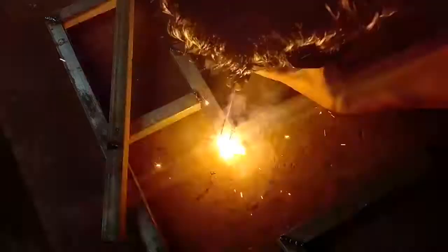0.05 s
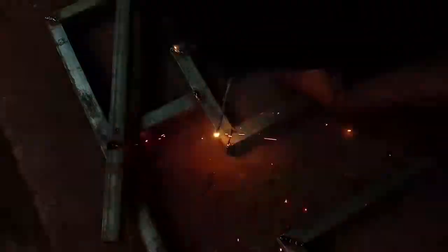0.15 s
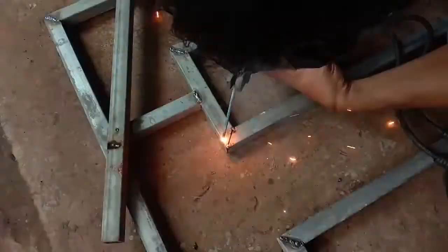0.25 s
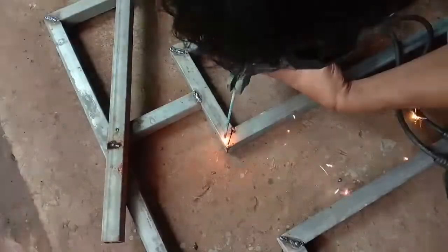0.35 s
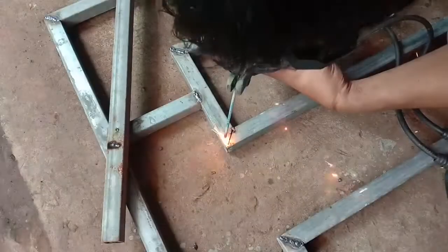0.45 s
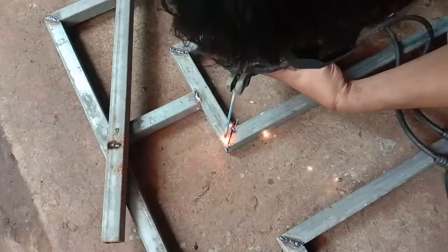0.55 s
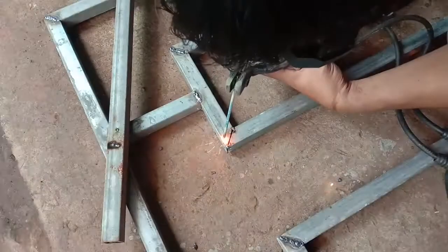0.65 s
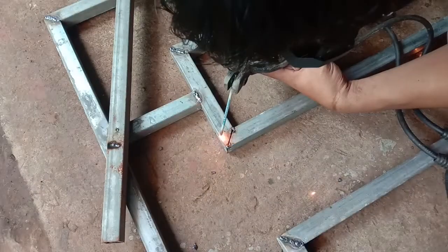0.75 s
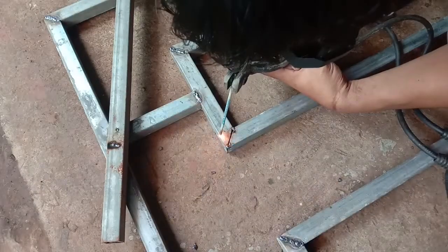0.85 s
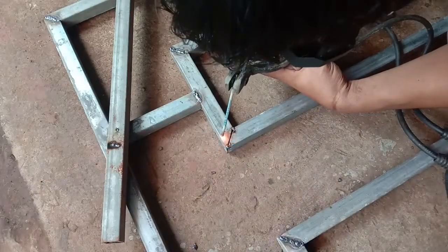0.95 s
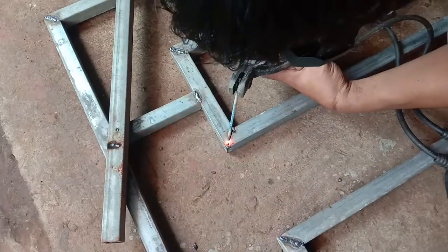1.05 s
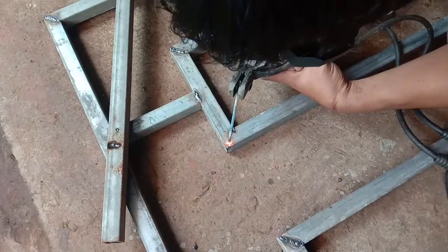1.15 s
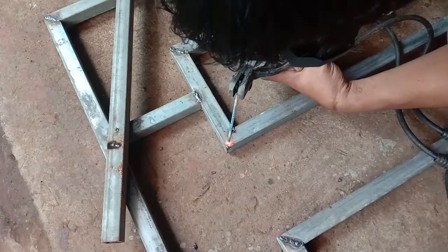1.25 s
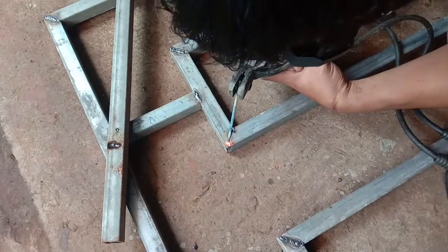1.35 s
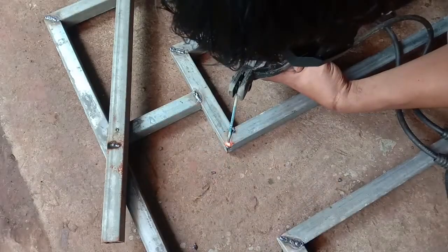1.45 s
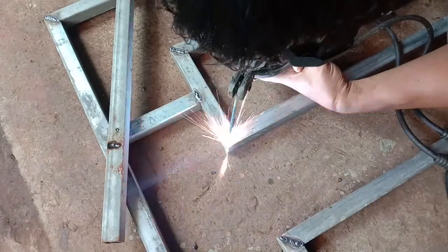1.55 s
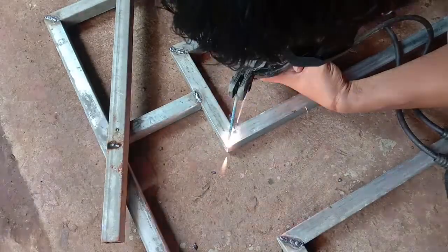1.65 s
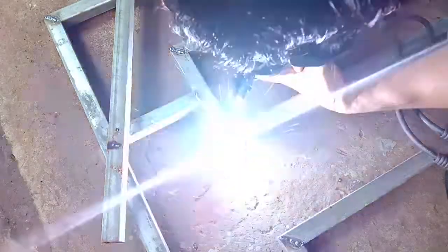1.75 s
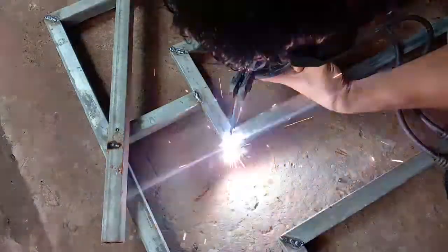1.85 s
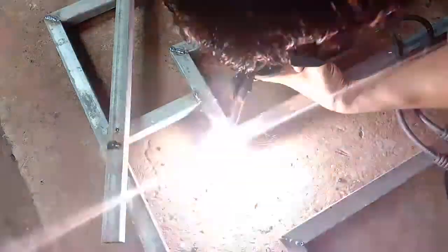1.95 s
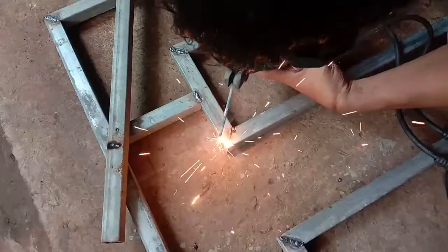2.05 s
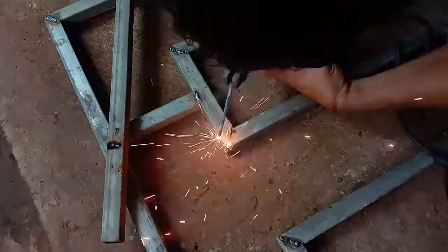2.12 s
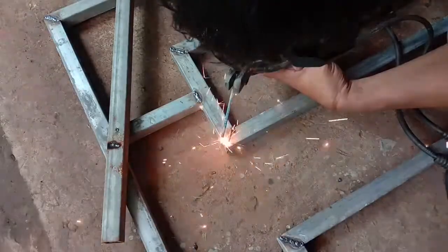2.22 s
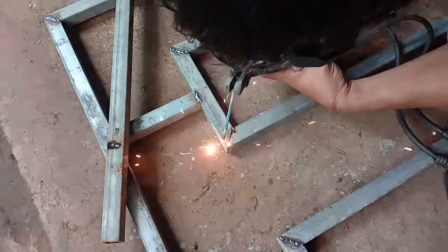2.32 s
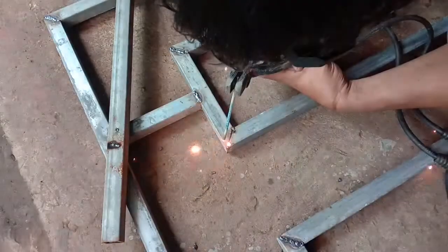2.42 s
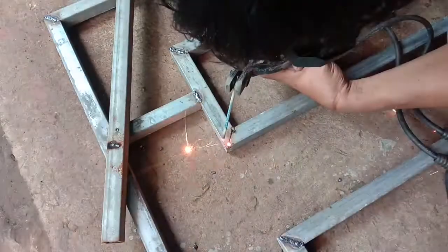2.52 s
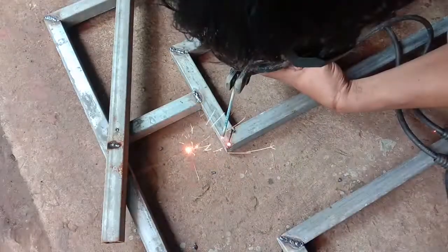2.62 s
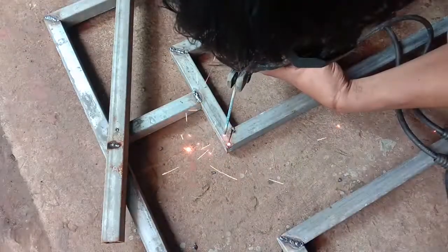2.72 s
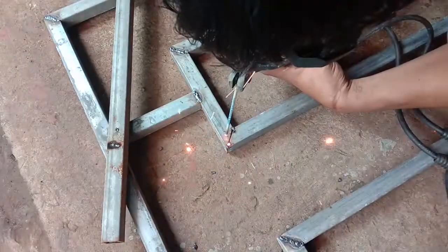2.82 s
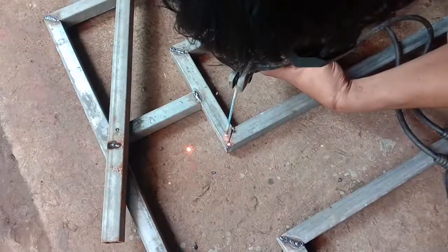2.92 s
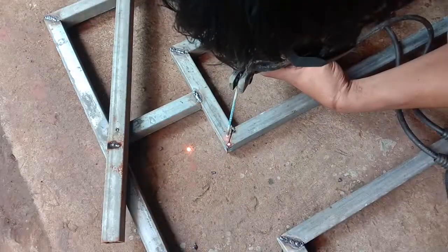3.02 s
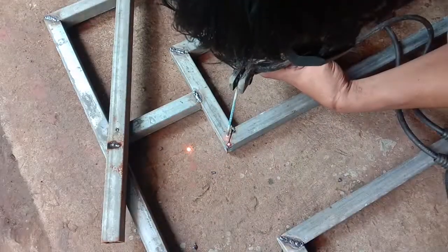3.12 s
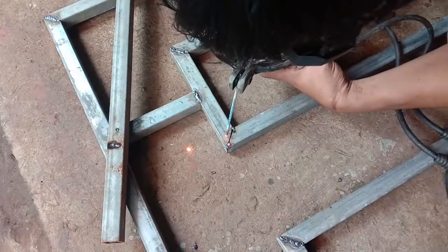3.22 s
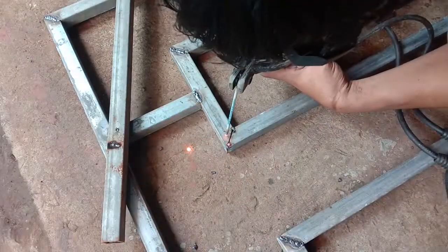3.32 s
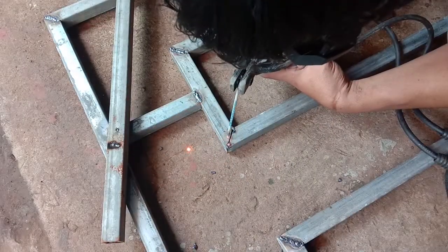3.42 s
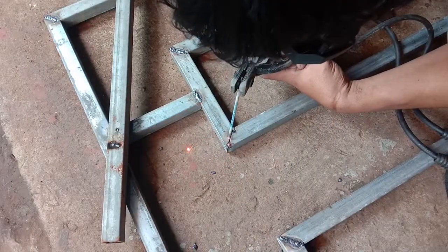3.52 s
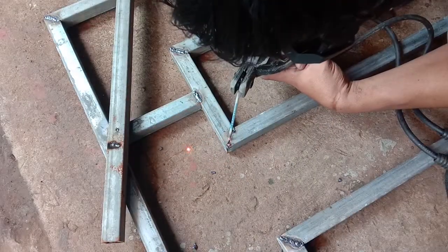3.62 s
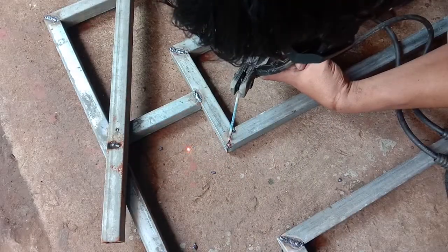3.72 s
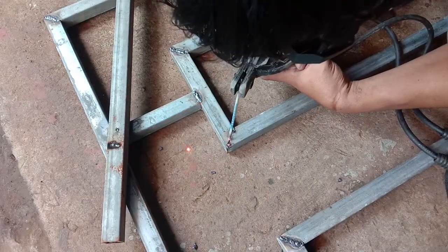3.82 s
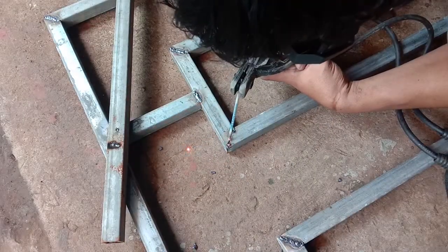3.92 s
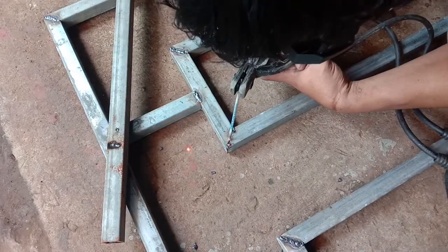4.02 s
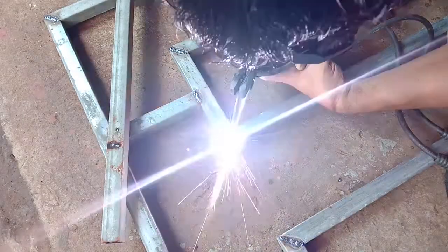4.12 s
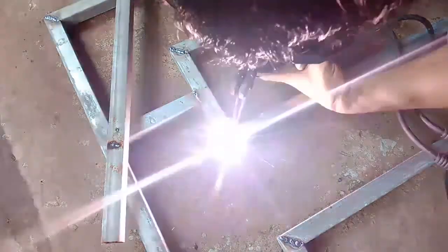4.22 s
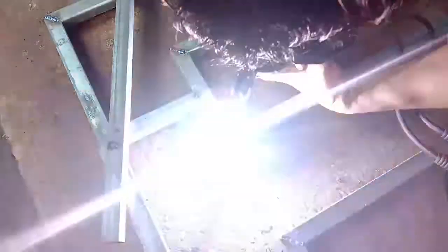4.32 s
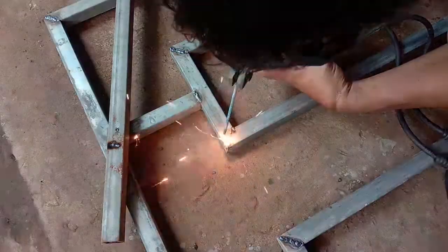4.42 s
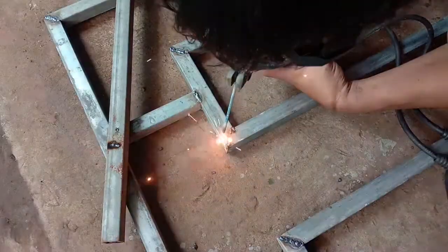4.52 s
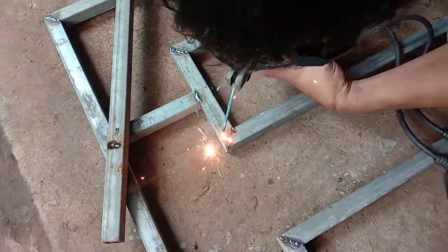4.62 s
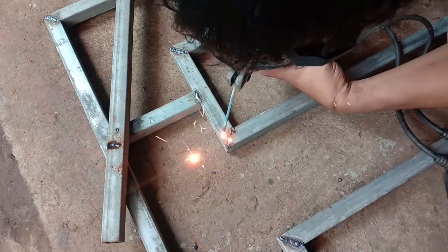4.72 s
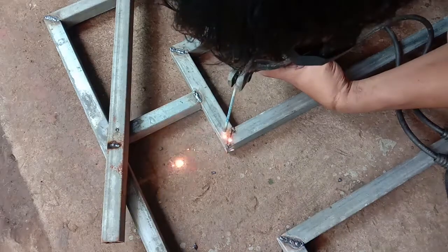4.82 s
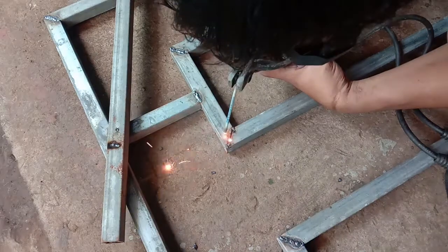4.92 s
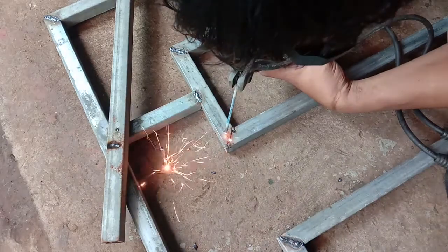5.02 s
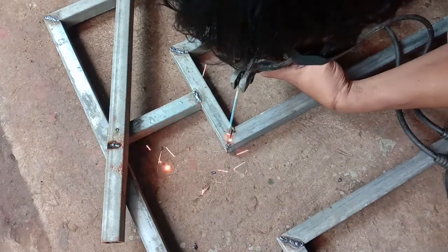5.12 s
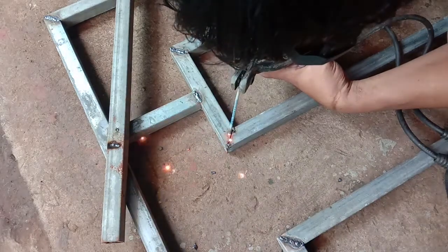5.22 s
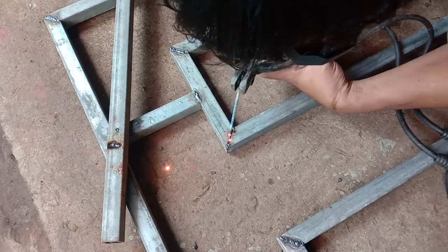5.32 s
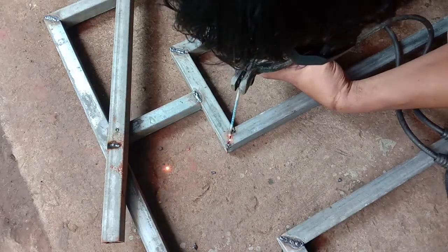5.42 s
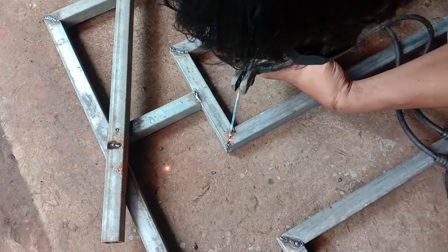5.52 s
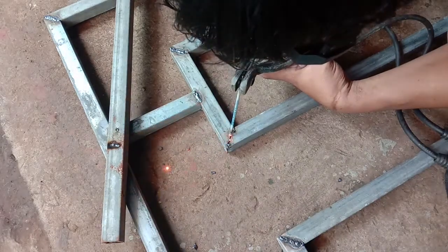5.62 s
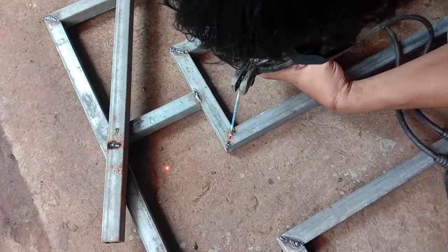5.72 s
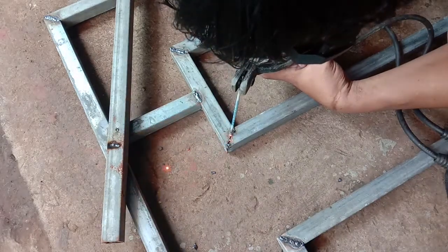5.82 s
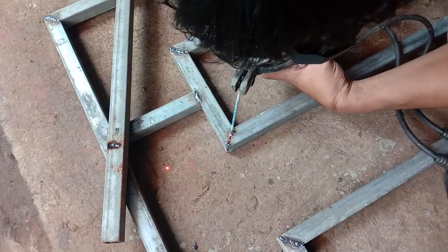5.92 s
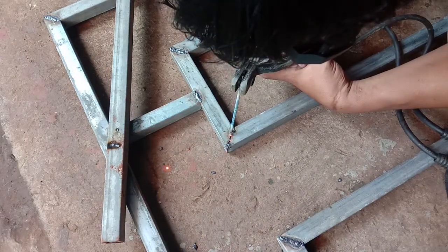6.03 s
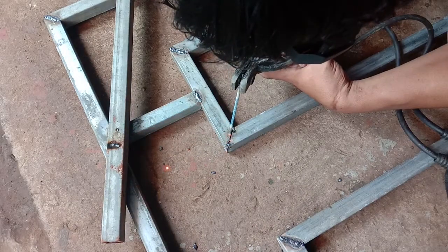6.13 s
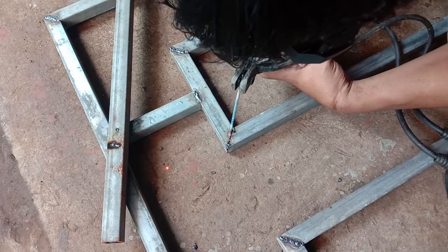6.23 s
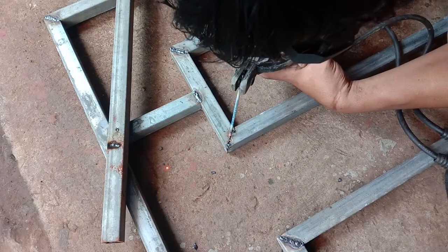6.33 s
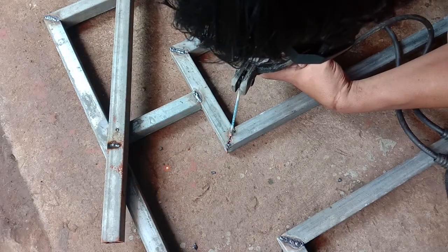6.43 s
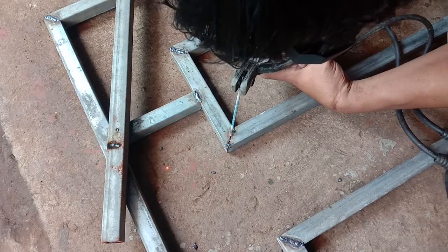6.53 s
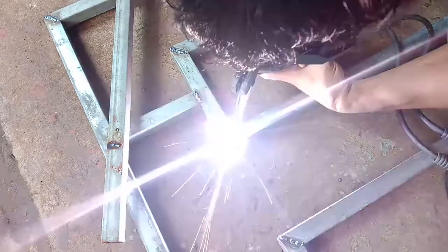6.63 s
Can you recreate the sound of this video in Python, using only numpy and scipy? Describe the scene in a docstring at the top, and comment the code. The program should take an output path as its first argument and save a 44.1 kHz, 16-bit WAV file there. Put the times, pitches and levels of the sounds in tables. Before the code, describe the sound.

A stick welder strikes short, sizzling, popping arcs on a steel tube, over the steady whine and rush of its cooling fan.

```python
"""Tack welds with a stick electrode on a thin steel tube frame lying on a concrete floor, close up.
The welder's seven-bladed fan whines and rushes from the start, and a little air stirs at the microphone.
The arc strikes with a thump and leaves slag ticking as it cools. At 1.6 s and 4.1 s come two longer tacks:
bright sizzle, sharp pops as droplets short the arc, the tube ringing under the rod, then fizz and ticks.
From 6 s the rod and spatter knock and puff, and at 6.6 s the arc catches once more."""
import sys
import numpy as np
from scipy import signal
from scipy.fft import rfft, irfft
from scipy.io import wavfile

SR = 44100
rng = np.random.default_rng(int(sys.argv[2]) if len(sys.argv) > 2 else 0)


def to_wav(s):
    """Save 16-bit WAV."""
    ch = np.atleast_2d(s).T  # columns
    pcm = np.round(np.clip(ch, -1, 1) * 32767)  # PCM
    wavfile.write(sys.argv[1], SR, pcm.astype(np.int16))


N = 293706
TIME = np.arange(N) / SR

# low swells, from breeze on the microphone and (first and last) the arc thumping as it strikes:
# (centre t/s, half length/s, level/dB)
LOW_SWELLS = [(0.03, 0.045, -40), (2.03, 0.1, -50.5), (2.6, 0.26, -53.5), (3.2, 0.25, -54),
              (4.42, 0.15, -58), (4.92, .1, -58), (5.2, .07, -56), (6.17, 0.055, -47), (6.61, 0.031, -53)]
# their rumble; each colour is a relative noise spectrum: (f/Hz, level/dB)
RUMBLE_COLOUR = [(20, 15.5), (35, -14), (55, -1), (100, 7.5), (200, 5), (400, -35.5)]
# single low thumps, first the arc striking, then breeze on the microphone: (t/s, peak level/dB, f/Hz)
LOW_THUMPS = [(0.04, -25.5, 151), (1.89, -41, 70), (1.95, -35, 50), (2.622, -32, 89), (2.655, -38, 60),
              (2.714, -35, 90), (2.74, -35, 80), (2.765, -49, 60), (3.161, -39, 108), (3.39, -36, 80.5),
              (5.2, -36.5, 174), (6.17, -37, 171)]

# the fan's blade-pass pitch: (t/s, f/Hz)
FAN_PITCH = [(0, 552.7), (0.8, 552.5), (1.5, 552.8), (2.2, 552.3), (2.8, 551.9), (3.4, 552.7), (4.0, 552.2),
             (4.8, 551.6), (5.3, 549.8), (5.8, 549.6), (6.66, 550.0)]
# whine heard through standing waves that shift with the pitch:
# (blade harmonic, rms level at full speed/dB, gain as the pitch sags/(dB/Hz))
FAN_WHINE = [(1, -47.5, 1.0), (3, -48, 0.7), (4, -43, -2), (6, -48.5, 0.46)]
# fainter fan tones: (multiple of the shaft rate)
SHAFT_ORDERS = [6, 9, 11, 12, 14, 35, 49, 56, 63]
# one level for each of those tones: (rms level/dB)
SHAFT_LEVELS = [-59, -62, -63, -65, -56, -60, -63, -71, -71]
# air rushing through the case, up to 4.7 kHz: (f/Hz, level/dB)
RUSH_COLOUR = [(150, -10.5), (380, -7.5), (480, -3), (950, -3), (1200, -13.5), (1550, -3), (1900, -15),
               (2350, 0.5), (2700, -2.5), (2850, -7), (3700, -8), (4700, -13.5)]
# the same rush from 4.7 kHz up: (f/Hz, level/dB)
RUSH_TOP_COLOUR = [(4700, -12), (6500, -12), (7300, -20), (8300, -30), (10200, -36), (11500, -45),
                   (13900, -53), (14600, -43), (15200, -40), (16000, -44)]

# the weld and fallen sparks fizz, swell and cool: (crest t/s, top band level/dB)
FIZZ_SWELLS = [(0.0, -61.5), (0.52, -62.5), (2.0, -59), (4.41, -64), (4.97, -64), (6.12, -64)]
# the sheen of that fizz: (f/Hz, level/dB)
FIZZ_COLOUR = [(8000, -0.5), (10400, -3), (11500, -9.5), (13800, -15), (14800, -3), (16500, 1)]
# slag cracks and sparks land: (t/s, top band peak level/dB, mid band against it/dB)
SLAG_TICKS = [(0.1585, -47, 6), (0.2249, -45, 2), (0.2553, -44, 9), (0.2674, -47, 6), (0.4015, -43, 12),
              (0.4473, -38, 5.5), (0.5227, -45, 8), (2.1241, -43, 0), (2.3575, -49, 13), (2.4144, -47, 8),
              (3.9666, -39, 8), (4.5231, -48, 4), (4.6833, -45, 2), (4.7386, -43, 5), (4.7444, -45, 2),
              (4.7514, -43, 0), (4.7604, -48, 0), (4.7935, -44, 3), (4.8254, -41, 7), (4.8314, -43, 9),
              (4.8474, -46, 3), (4.9023, -46, 3), (4.9463, -39.5, 10), (5.004, -39, 8), (5.0144, -47, 2),
              (5.0294, -47, 4), (5.0689, -44, 10), (5.1103, -48, 12)]
# the brittle top of those ticks: (f/Hz, level/dB)
SLAG_COLOUR = [(8000, -1), (10000, 0), (11300, -7), (12000, -9), (13700, -17), (14700, -1), (16500, -6)]

# the hollow tube's ring, many modes near odd multiples of 79 Hz like an air column closed at one end:
# (f/Hz, relative level/dB, t60/s)
TUBE_MODES = [(385, -3, .25), (461, -4, .2), (555, -3, .25), (722, -3, .25), (875, 0, .3), (1027, -2, .3),
              (1195, -1, .3), (1357, -4, .3), (1500, 0, .3), (1823, -3, .2), (2134, -2, .15),
              (2465, 0, .15), (2620, -4, .12), (2769, -2, .2), (2923, -5, .1), (3097, 0, .2),
              (3241, -4, .2), (3416, -8, .2), (3720, -7, .2), (3946, -7, .2), (4490, -6, .15),
              (4670, -6, .12), (4760, -4, .18), (5229, -4, .14), (5348, -4, .14), (5585, -1, .12),
              (5766, -3, .12), (6240, 0, .12), (6336, -2, .08), (6492, -3, .12)]
# rod or spatter knocks and drags on the tube: (t/s, contact/s, low mode drive/dB, high mode drive/dB)
KNOCKS = [(0.002, 0.018, -34.5, -31), (1.562, 0.078, -39.5, -40), (4.107, 0.089, -35, -37),
          (6.059, 0.009, -57, -52), (6.121, 0.046, -62, -41), (6.413, 0.016, -60, -43.5),
          (6.598, 0.034, -32.5, -29)]

# the arc as the microphone colours it: (f/Hz, level/dB)
ARC_COLOUR = [(100, -24), (600, -14.5), (3600, -17.5), (4500, -10.5), (5500, -2.5), (6350, 2), (7000, -6),
              (7600, -19), (9400, -28), (10700, -21), (13800, -36.5), (14800, -25.5), (15500, -32),
              (16500, -55)]
# humps and hollows from nearby reflections: (f/Hz, width/Hz, gain/dB)
ARC_HUMPS = [(2440, 200, 4), (2920, 200, 4), (4000, 200, -5), (4330, 250, 4), (4950, 400, -3),
             (5430, 200, 2), (8000, 250, -5), (8740, 250, 3), (9100, 150, -6), (9480, 250, 5),
             (10000, 300, -6)]
# the arc flares or spatter puffs: (t/s, rise/s, burn/s, sizzle level/dB, fall/(dB/s),
# low roar against the sizzle/dB, top air against the sizzle/dB)
ARC_FLARES = [(0.0, 0.00033, 0.02, -26.5, 1500, -2, -16), (1.563, .001, 0.026, -31.5, 350, -9, -7.5),
              (1.655, 0.042, 0.031, -28, 900, -12, -12.5), (1.736, 0.00083, 0.019, -27.5, 700, -10.5, -9.5),
              (1.774, .005, 0.01, -32.5, 600, -7, -9), (1.829, 0.00078, 0.023, -29, 900, -17, -8.5),
              (1.85, 0.038, 0.02, -29, 300, -9.5, -10), (1.925, 0.014, 0.034, -29, 1500, -10.5, -13),
              (1.984, 0.00086, 0.0019, -29, 2000, 3, -8), (3.966, .002, .01, -52, 300, -20, -5),
              (4.106, 0.0015, 0.0066, -22, 600, -10.5, -14.5), (4.13, .001, .03, -39.5, 300, -6, -10),
              (4.199, 0.027, 0.011, -34.5, 500, -4.5, -5), (4.259, .001, 0.0076, -35, 500, -27, -7),
              (4.291, 0.041, 0.021, -23.5, 400, -16, -12), (4.361, 0.009, 0.019, -33.5, 3000, 0.5, -17),
              (6.058, 0.0028, 0.0052, -36, 500, -20, -13), (6.121, .002, 0.004, -24.5, 450, -35, -11),
              (6.412, 0.0023, 0.0036, -37.5, 448, -16, -25), (6.585, .001, .01, -37, 500, -13, -10),
              (6.597, .001, 0.0054, -27, 400, 4.5, -8.5), (6.634, 0.0095, .02, -27, 400, -10, -10)]
# droplet pops: (t/s, mid band peak level/dB, low band against it/dB, top band against it/dB)
ARC_POPS = [(0.0032, -10, -12, -25), (0.0115, -10, -7, -27), (0.0202, -15, -3, -29),
            (1.5643, -12, -12, -19), (1.5693, -9, -15, -20), (1.593, -14, -9, -18), (1.6055, -17, -23, -15),
            (1.6959, -14, -21, -19), (1.7018, -14, -26, -20), (1.7107, -14, -15, -20),
            (1.7159, -14, -26, -19), (1.7383, -11, -29, -24), (1.742, -11, -29, -23),
            (1.7543, -13, -14, -13), (1.7658, -15, -25, -18), (1.7864, -10, -25, -26),
            (1.8085, -27, -13, -10), (1.8317, -9, -30, -15), (1.839, -14, -26, -17),
            (1.8449, -15, -25, -22), (1.889, -17, -10, -16), (1.8986, -14, -26, -18),
            (1.9061, -15, -25, -16), (1.937, -20, -20, -16), (1.9855, -9, -8, -19), (4.1083, -13, -10, -19),
            (4.1123, -7, -14, -22), (4.1876, -31, 0, -9), (4.2288, -15, -25, -7), (4.2596, -9, -31, -23),
            (4.2661, -17, -23, -22), (4.2979, -22, -7, -14), (4.3351, -12, -28, -21),
            (4.3405, -9, -31, -14), (4.3433, -9, -31, -22), (4.3469, -10, -19, -21),
            (4.3521, -10, -30, -26), (4.3665, -14, -3, -22), (4.3724, -13, -13, -24),
            (4.3859, -11, -5, -22), (6.1218, -16, -24, -19), (6.1255, -14, -26, -21), (6.5998, -13, 1, -15),
            (6.604, -14, -4, -15), (6.6102, -15, -4, -21), (6.651, -15, -14, -18)]

LOW_HZ, TOP_HZ = 3300, 8600  # crossovers between the low, mid and top bands


def from_db(db):
    """Decibels to gain."""
    return 10 ** (np.asarray(db) / 20)


def unit_power(x):
    """Scales a signal to an rms of 1."""
    return x / np.sqrt(np.mean(x ** 2) + 1e-20)


def unit_energy(pulse):
    """Scales an impulse response so that it keeps the power of white noise."""
    return pulse / np.sqrt(np.sum(pulse ** 2))


def through(x, pulse):
    """Filters by an impulse response."""
    return signal.fftconvolve(x, pulse)[:N]


def drift(rate_hz):
    """A smooth random wobble with an rms of about 1."""
    step, settle = 40, 2000
    pole = np.exp(-2 * np.pi * step * rate_hz / SR)
    noise = rng.standard_normal(N // step + settle + 2)
    slow = signal.lfilter([1], [1, -2 * pole, pole * pole], noise)[settle:]
    return np.interp(np.arange(N) / step, np.arange(len(slow)), unit_power(slow))


def envelope_db(start_s, full_s, release_s, up_db_per_s, down_db_per_s):
    """Silence, a straight climb to 0 dB, a hold, a straight fall."""
    climb = -up_db_per_s * np.maximum(full_s - TIME, 0) - 200 * (TIME < start_s)
    return climb - down_db_per_s * np.maximum(TIME - release_s, 0)


def equaliser(colour, low_hz=0, high_hz=SR, humps=(), size=8192):
    """Causal impulse response of unit energy with this colour between two soft band edges."""
    hz = np.maximum(np.arange(size // 2 + 1) * SR / size, 1)
    points_hz, level_db = np.transpose(colour)
    shape_db = np.interp(np.log(hz), np.log(points_hz), level_db)
    shape_db += sum(db * np.exp(-2 * ((hz - centre) / width) ** 2) for centre, width, db in humps)
    edges = np.log1p((low_hz / hz) ** 12) + np.log1p((hz / high_hz) ** 12)
    cepstrum = irfft(np.log(from_db(shape_db)) - edges / 2)
    cepstrum[1:size // 2] *= 2  # folding to minimum phase keeps attacks tight
    cepstrum[size // 2 + 1:] = 0
    return unit_energy(irfft(np.exp(rfft(cepstrum))))


def crackle(per_s, spread_db):
    """Random clicks, mostly small, a few large; unit power on average."""
    sizes = from_db(spread_db * np.minimum(rng.exponential(1, N), 4)) * rng.choice([-1, 1], N)
    return unit_power(sizes) * (rng.random(N) < per_s / SR) * np.sqrt(SR / per_s)


def snaps(times, peaks_db, bands, decay_s, size=160):
    """Fast-dying splinters of noise, each with its own peak level in every band."""
    splinters = rng.standard_normal((len(times), size)) * np.exp(-np.arange(size) / (decay_s * SR))
    out = np.zeros(N + size + len(bands[0]))
    for t, splinter, band_peaks_db in zip(times, splinters, peaks_db):
        start = round(t * SR)
        for band, peak_db in zip(bands, band_peaks_db):
            snap = signal.fftconvolve(splinter, band)
            out[start:start + len(snap)] += from_db(peak_db) * snap / np.abs(snap).max()
    return out[:N]


def room(x, t60_s=0.09, wet_db=-18.5, predelay_s=0.003):
    """Floor, frame and walls send back a short diffuse tail."""
    t = np.arange(SR // 2) / SR
    tail = rng.standard_normal(len(t)) * from_db(-60 * t / t60_s) * (t > predelay_s)
    return x + from_db(wet_db) * through(x, unit_energy(tail))


def rumble_and_thumps(stir_db=-57):
    """Low swells and short thumps: breeze on the microphone, and the arc thumping as it strikes."""
    swells = sum(from_db(db) * np.exp(-((TIME - t) / half_s) ** 2) for t, half_s, db in LOW_SWELLS)
    gain = (from_db(stir_db) + swells) * from_db(2.5 * drift(12))
    out = gain * through(rng.standard_normal(N), equaliser(RUMBLE_COLOUR))
    for t, peak_db, hz in LOW_THUMPS:
        cycles = (TIME - t) * hz
        out -= from_db(peak_db) * np.exp(-(cycles / 0.6) ** 2) * np.cos(2 * np.pi * cycles)
    return out


def fan(blades=7, full_speed_hz=552.4, rush_db=-40.5):
    """Blade harmonics and shaft tones waver over a steady bed of air rushing through the case."""
    pitch_hz = np.interp(TIME, *np.transpose(FAN_PITCH))
    shaft_turns = np.cumsum(pitch_hz + 0.5 * drift(25.8)) / SR / blades
    rush_gain = from_db(rush_db + 0.45 * drift(9.4))
    out = rush_gain * through(rng.standard_normal(N), equaliser(RUSH_COLOUR + RUSH_TOP_COLOUR[1:]))
    sag_hz = full_speed_hz - pitch_hz
    whine = [(blades * harmonic, db + db_per_hz * sag_hz) for harmonic, db, db_per_hz in FAN_WHINE]
    for order, level_db in whine + list(zip(SHAFT_ORDERS, SHAFT_LEVELS)):
        phase = 2 * np.pi * (order * shaft_turns + rng.random())
        out += np.sqrt(2) * from_db(level_db + 0.56 * drift(7)) * np.sin(phase)
    return out


def cooling_fizz(mid, swell_db_per_s=50, cool_db_per_s=29.5, cold_db=-96):
    """Hot weld and fallen sparks give a faint, crackly fizz that swells, then fades as they cool."""
    heat = sum(from_db(db + envelope_db(0, t, t, swell_db_per_s, cool_db_per_s)) ** 2
               for t, db in FIZZ_SWELLS)
    fizz = unit_power(rng.standard_normal(N) + 0.45 * crackle(70, spread_db=3))
    fizz *= np.sqrt(heat + from_db(cold_db) ** 2) * from_db(1.3 * drift(14))
    flicker = from_db(-14 + 7.9 * drift(5.6))  # one narrow band swells in short patches
    shimmer = through(fizz * flicker, equaliser(FIZZ_COLOUR, low_hz=10200, high_hz=12200))
    sheen = through(fizz, equaliser(FIZZ_COLOUR, low_hz=TOP_HZ))
    body = from_db(12) * through(fizz, mid)
    return body + sheen + shimmer


def slag_ticks(mid):
    """Cooling slag cracks and sparks land with tiny, brittle ticks."""
    times, top_db, mid_db = np.transpose(SLAG_TICKS)
    peaks_db = np.transpose([top_db + mid_db, top_db])
    return snaps(times, peaks_db, (mid, equaliser(SLAG_COLOUR, low_hz=TOP_HZ)), decay_s=0.0015)


def tube_ring(modes, size=14000):
    """The steel tube's answer to one click: a cluster of dying sines."""
    t = np.arange(size) / SR
    ring = sum(from_db(db - 60 * t / t60) * np.sin(2 * np.pi * hz * t) for hz, db, t60 in modes)
    return unit_energy(ring)


def tube_knocks(attack_decay_s=0.0032):
    """Rough contact from rod or spatter, hardest at first, sets the tube ringing."""
    low_drive, high_drive = np.zeros((2, N))
    roughness = rng.standard_normal(N)
    for t, contact_s, low_db, high_db in KNOCKS:
        touching = (TIME >= t) & (TIME < t + contact_s)
        scrape = roughness * touching * (1 + 2 * np.exp(-np.abs(TIME - t) / attack_decay_s))
        low_drive += from_db(low_db) * scrape
        high_drive += from_db(high_db) * scrape
    low_ring = tube_ring([mode for mode in TUBE_MODES if mode[0] < LOW_HZ])
    high_ring = tube_ring([mode for mode in TUBE_MODES if mode[0] >= LOW_HZ])
    return through(low_drive, low_ring) + through(high_drive, high_ring)


def arc_pops(bands):
    """Molten droplets short the arc, and it bursts back with a sharp pop."""
    times, mid_db, low_db, top_db = np.transpose(ARC_POPS)
    peaks_db = np.transpose([mid_db + low_db, mid_db, mid_db + top_db])
    return snaps(times, peaks_db, bands, decay_s=0.0005)


def arc_sizzle(bands, rise_db=15, glow_db=-13.5, glow_fall_db_per_s=171, spits_db=-9.5):
    """Thousands of tiny discharges a second over plasma hiss, sputtering as the rod melts."""
    band_powers, burning = np.zeros((3, N)), np.zeros(N, bool)
    for t, rise_s, burn_s, level_db, fall_db_per_s, roar_db, air_db in ARC_FLARES:
        full_s, end_s = t + rise_s + 1e-4, t + rise_s + burn_s
        flare = from_db(level_db + envelope_db(t, full_s, end_s, rise_db / (full_s - t), fall_db_per_s))
        # each flare leaves a softer, slower hiss behind
        glow = from_db(level_db + glow_db + envelope_db(full_s, full_s, end_s, 0, glow_fall_db_per_s))
        band_powers += (flare ** 2 + glow ** 2) * from_db([[roar_db], [0], [air_db]]) ** 2
        burning |= (TIME >= t) & (TIME < end_s)
    sparks = unit_power(crackle(2200, spread_db=2.8) + 1.2 * rng.standard_normal(N))
    sparks *= from_db(2.4 * drift(180))  # fast sputter
    sparks += burning * from_db(spits_db) * crackle(180, spread_db=2)
    return sum(through(sparks * np.sqrt(power), band) for power, band in zip(band_powers, bands))


def scene():
    """The weld in its room, up front over a bed of fan and low rumble; mono."""
    edges_hz = [(0, LOW_HZ), (LOW_HZ, TOP_HZ), (TOP_HZ, SR)]
    bands = [equaliser(ARC_COLOUR, *edges, humps=ARC_HUMPS) for edges in edges_hz]
    mid = bands[1]
    weld = arc_sizzle(bands) + arc_pops(bands) + tube_knocks() + cooling_fizz(mid) + slag_ticks(mid)
    return (room(weld) + fan() + rumble_and_thumps())[None]


def record(dry, bass_hz=45, edge_hz=15480, cutoff_hz=16400):
    """The deepest bass rolls off; a low-pass softens the highest air and a steep cut takes the rest."""
    thinned = signal.sosfilt(signal.butter(5, bass_hz, "high", fs=SR, output="sos"), dry)
    softened = signal.sosfilt(signal.ellip(7, 0.5, 28, edge_hz, fs=SR, output="sos"), thinned)
    return signal.sosfilt(signal.ellip(10, 0.2, 90, cutoff_hz, fs=SR, output="sos"), softened)


dry = scene()
out = record(dry)
to_wav(out)
```